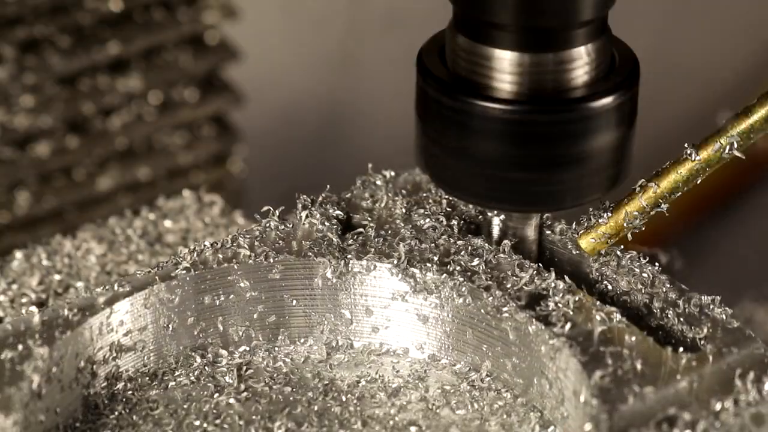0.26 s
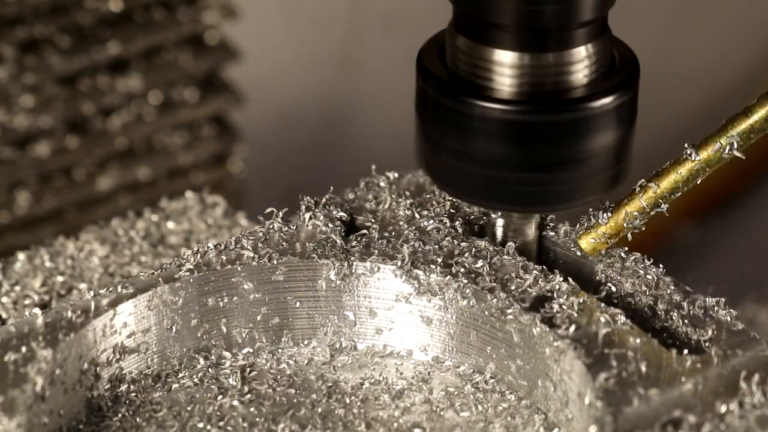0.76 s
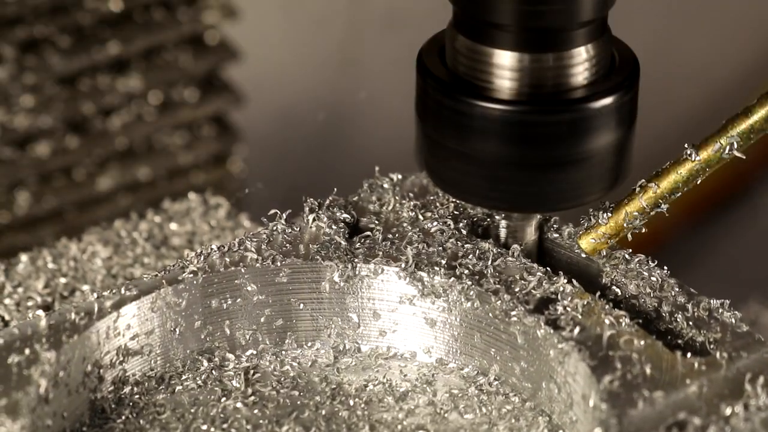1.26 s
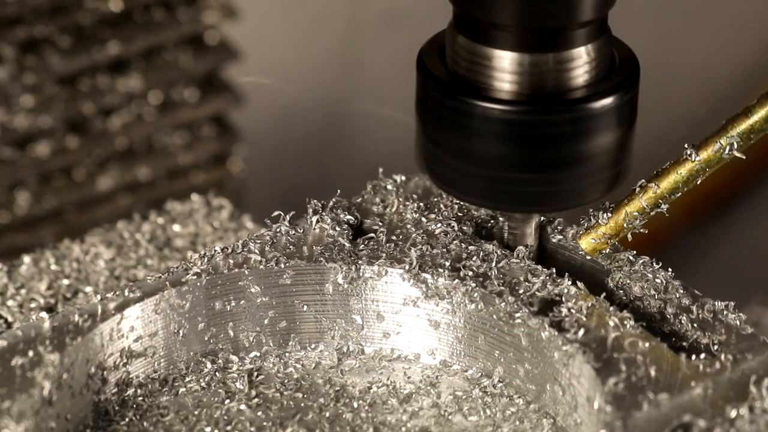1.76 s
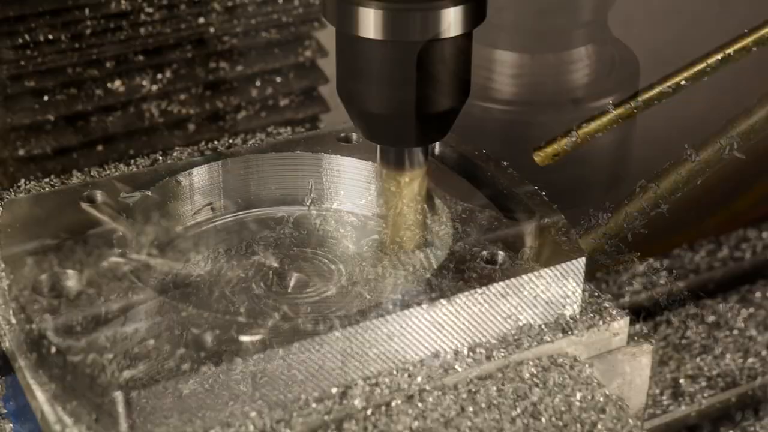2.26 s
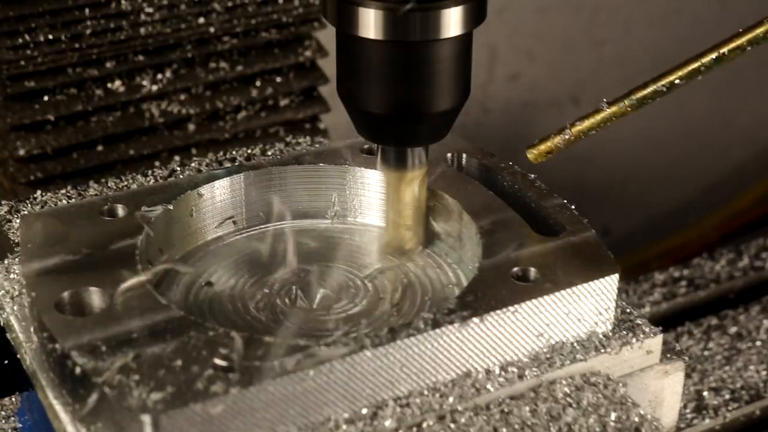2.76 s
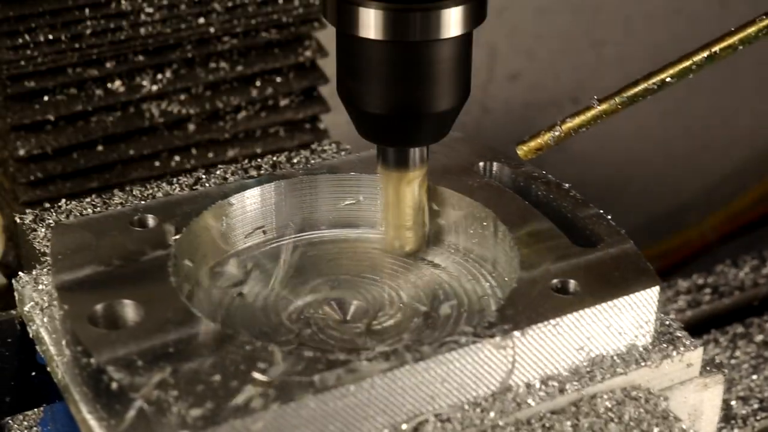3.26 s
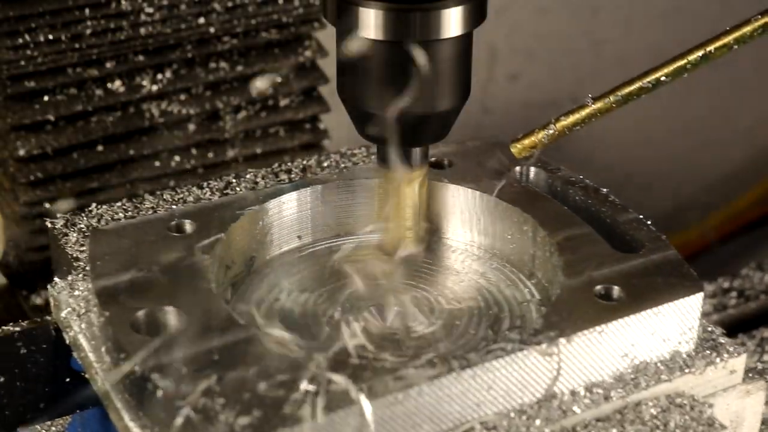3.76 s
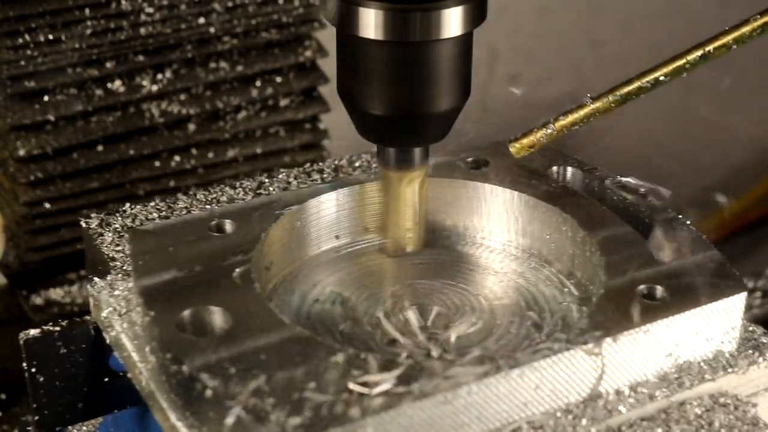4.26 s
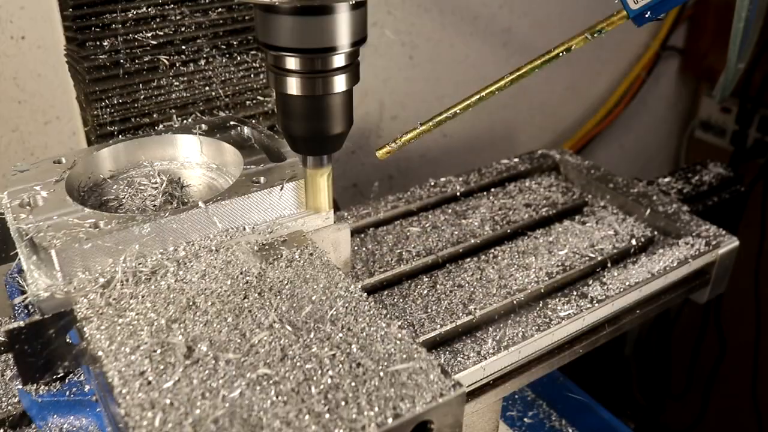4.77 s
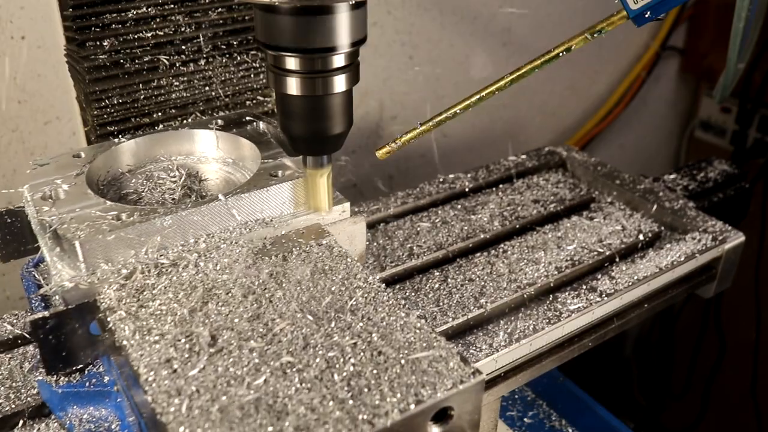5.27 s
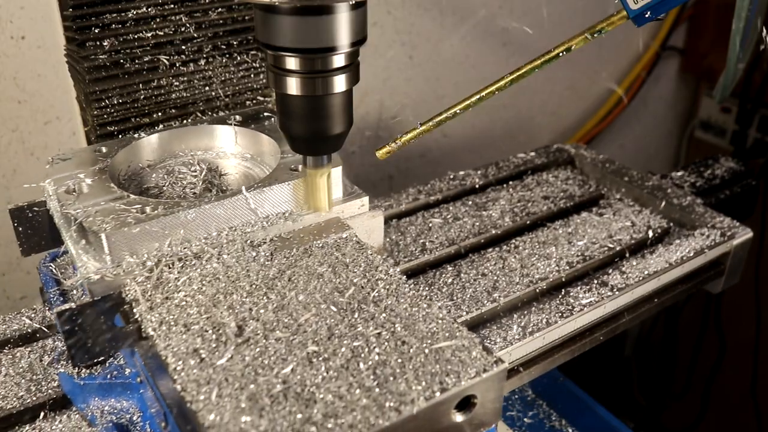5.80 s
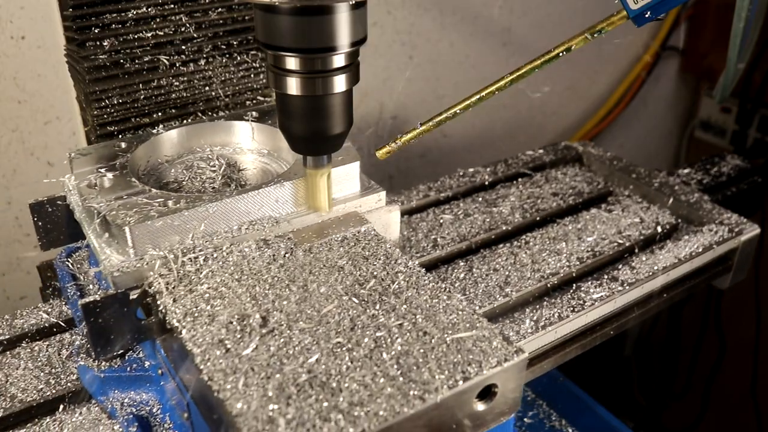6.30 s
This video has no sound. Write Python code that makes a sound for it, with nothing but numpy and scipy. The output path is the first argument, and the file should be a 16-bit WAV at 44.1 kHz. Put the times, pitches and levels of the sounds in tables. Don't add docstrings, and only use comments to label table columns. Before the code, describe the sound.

A continuous, bright air-nozzle hiss dominates a small metal milling machine at work. It opens with a toned whirr and faint squeal, which melt into a thinner, mostly airy passage with light ticks. A low spindle hum then swells in with short squeaks and dull chip knocks, and continues into a steadier facing cut. Close stereo microphone in a small workshop, hiss slightly stronger on the right, very little echo.

```python
import sys
import numpy as np
from scipy import signal
from scipy.fft import rfft, irfft, next_fast_len
from scipy.io import wavfile
from scipy.ndimage import uniform_filter1d, map_coordinates

SR = 44100
rng = np.random.default_rng(int(sys.argv[2]) if len(sys.argv) > 2 else 0)


def nominal_scale(level):
    x = np.asarray(level, float) / 20
    return 10 ** x


def wav_out(sig):
    wavfile.write(sys.argv[1], SR, np.round(np.clip(np.atleast_2d(sig).T, -1, 1) * 32767).astype(np.int16))


N = 288414
TIME = np.arange(N) / SR
FFT_SIZE = next_fast_len(N, True)

# start in seconds, end in seconds.
DISSOLVES = [
    (-.2, .33),
    (2.03, 2.51),
    (4.33, 4.8),
]
# jet in dB, frame in dB.
JOB_DB = [(6, -31.5), (-0.5, -41.5), (3, -41), (5, -35)]
MID_JOB_S = [.1, 1.2, 3.3, 5.6]

# frequency in Hz, level in dB per Hz.
JET_SMALL_CUTTER = [
    ([(4130, -76.2), (5000, -78.7), (6890, -74.0), (7580, -69.9), (9470, -79.7), (10850, -77.6), (11370, -81.1), (15500, -84.1)], [(4130, -74.1), (5000, -77.1), (7060, -69.1), (7750, -62.7), (9470, -76.3), (10680, -72.5), (14990, -79.0), (15500, -82.2)]),
    ([(4050, -84.5), (4480, -86.4), (5340, -76.1), (5940, -84.5), (6550, -85.3), (7580, -73.0), (9470, -83.0), (10340, -80.8), (10770, -74.3), (11280, -84.2), (14210, -80.7), (14640, -86.6), (15590, -86.0)], [(4050, -81.8), (4480, -85.1), (5770, -73.1), (7060, -74.9), (7670, -62.4), (8530, -63.6), (9390, -75.8), (10680, -70.3), (11110, -75.7), (11630, -74.1), (12490, -80.8), (13180, -75.6), (15590, -82.7)]),
]
JET_LARGE_CUTTER = [
    ([(4050, -78.7), (4820, -80.5), (5770, -76.4), (6120, -77.1), (6460, -73.5), (6980, -74.1), (7840, -68.5), (8530, -72.4), (9390, -71.7), (10160, -76.1), (10770, -75.2), (11710, -79.1), (15590, -84.9)], [(4050, -78.7), (5340, -78.0), (6200, -72.2), (6550, -67.6), (6980, -70.6), (7490, -66.0), (8270, -65.5), (8610, -68.7), (9730, -68.5), (10340, -74.7), (13780, -76.1), (14730, -81.5), (15590, -80.8)]),
    ([(4050, -77.6), (4820, -80.8), (6200, -74.8), (6550, -71.8), (6800, -73.4), (7580, -69.7), (8700, -71.5), (9040, -69.8), (10080, -73.9), (13010, -75.2), (13350, -77.8), (14380, -76.8), (15590, -80.6)], [(4050, -76.9), (5430, -76.7), (5770, -71.4), (6290, -72.8), (6720, -68.1), (6980, -70.6), (8440, -65.7), (8790, -69.6), (9130, -67.2), (10770, -74.8), (12060, -72.7), (14470, -76.8), (15590, -81.2)]),
]
JET = JET_SMALL_CUTTER + JET_LARGE_CUTTER
# frequency in Hz, likeness from 0 to 1.
JET_ALIKE = [
    [(4500, .2), (5000, .75), (5500, .6), (6600, .45), (7500, .85), (10000, .7), (12500, .5), (15000, .6)],
    [(4500, .45), (6000, .45), (7700, .8), (11000, .5), (15000, .3)],
    [(5000, .15), (6500, .55), (9000, .7), (12000, .55), (15000, .6)],
]
# frequency in Hz, lead in radians.
JET_LEAD = [
    [(4500, .9), (5100, .2), (5300, 3), (5800, 2.9), (6100, 1.7), (6450, 2.8), (6800, .5), (7300, 2.5),
     (7900, 2.4), (8200, 1.7), (9300, 1.4), (11500, 2.7), (14300, 2.9), (15000, 1.9)],
    [(4000, .3), (6000, .8), (7500, .3), (12000, 1.2), (15000, 1.4)],
    [(4000, -.3), (6000, -1.1), (8000, -.4), (10500, -.9), (15000, -.6)],
]
JET_BANDS = (4570, 8200, 11000, 18000)
JET_LEFT_DB = [0, -1.2, -.5, 0]
# rate in Hz, depth from 0 to 1.
CHOP = [(124, 0.2), (64.2, 0.08), (123.7, 0.11), (124.55, 0.18)]
# time in seconds, jet core in dB.
AIR = [(0, -36), (.35, -39.5), (1.05, -41), (1.77, -43), (2.06, -42.5), (2.3, -39.5), (2.71, -37.5),
       (3.22, -37), (3.6, -37), (4.3, -38.5), (4.64, -39), (5.4, -37.5), (6.1, -38.5), (6.36, -37.5),
       (6.54, -38.5)]
# upper band at mid job in dB,
# its drift in dB per second, top band at mid job in dB, its drift in dB per second.
AIM = [(-8, -6, -9, 0.1), (-1, 3.5, -5.5, 3), (-1.5, 1.5, -6.5, -2.5), (0, 0.5, -2.5, -1.2)]
# peak in seconds, length in seconds, level in dB from the core.
FLARE = (2.28, 0.46, -4)
# frequency in Hz, level in dB per Hz.
RIM = [(9000, -60), (10600, -12), (11200, 2), (12800, -6), (13600, -6), (15500, -40)]
# start in seconds,
# end in seconds, frequency at start in Hz, frequency at end in Hz, gain in dB.
GAP_LEFT = [(-.2, .9, 8200, 8200, -3), (.1, 1.4, 6600, 6600, -3.5), (-.2, 2, 5900, 5900, -2.5),
            (-.2, 2.1, 13700, 13700, -2), (.5, 2.1, 11800, 11800, -1), (1, 2.7, 7750, 7500, -1.5),
            (.2, 3.4, 3500, 3500, 2.5), (.2, 3, 4200, 4200, -2.5), (.1, .8, 10800, 10800, 3),
            (.7, 1.8, 5000, 5000, -2), (2.3, 3.1, 8400, 8700, 3), (2.3, 2.9, 13200, 13000, 3),
            (2.1, 2.6, 5200, 5200, 3), (2.1, 2.6, 15600, 15600, 3.5), (3, 3.5, 7300, 7300, -2.5),
            (3.7, 4.4, 6500, 6900, -2), (3.7, 4.4, 10500, 10600, -3), (3.9, 4.5, 8700, 8600, -3),
            (4.45, 5.7, 10400, 10400, 3.5), (4.4, 5.2, 5100, 4600, 3), (4.8, 6.7, 9400, 9400, -2.5),
            (4.7, 5.2, 1100, 1100, 2.5), (6, 6.7, 4400, 4300, 3), (.4, 1.6, 950, 950, 2.5),
            (2.7, 3.5, 15400, 15400, -3), (4.3, 6.7, 13900, 13800, 2), (2.9, 4.2, 2600, 3100, -2),
            (2.05, 2.7, 10800, 13300, 2.5), (5.9, 6.7, 1250, 1200, -3)]
GAP_RIGHT = [(-.2, 1, 8250, 8250, -4), (.2, 1.3, 7650, 7650, 2), (.8, 1.9, 8650, 8600, 2.5),
             (1.9, 2.9, 7350, 7400, -3), (.3, 1.05, 9300, 9300, 3), (-.2, .7, 6100, 6000, -3),
             (.2, 2.2, 4400, 4700, 2.5), (-.2, 1.5, 13200, 13200, -2.5), (.8, 3.4, 6800, 6400, 2.5),
             (2.2, 2.9, 8300, 8200, 2), (2.8, 3.2, 9600, 9600, -3.5), (2.45, 2.9, 10600, 10700, 3),
             (3.3, 4.4, 9600, 9700, 2), (3.3, 4.1, 10800, 10700, 2), (3.4, 4.3, 8400, 8600, -3),
             (3.8, 4.8, 7900, 7200, 3), (1.8, 4.6, 5600, 5700, 3), (2.1, 4.4, 4000, 3800, -3),
             (4.6, 6.4, 3800, 3800, -2), (4.3, 5.3, 5100, 4500, 3), (4.6, 5.7, 10200, 10300, 3),
             (4.8, 6.3, 11900, 11400, 2.5), (4.7, 6.4, 12900, 12700, -2.5), (5.5, 6, 8400, 8400, 3),
             (3.7, 4.3, 13100, 13100, -2.5), (4.7, 5.2, 1100, 1100, 2.5), (3.05, 3.7, 13100, 12100, 2.5),
             (2.05, 2.8, 15600, 15300, 3), (3.9, 4.4, 15600, 15600, 3), (3.3, 3.8, 7600, 7500, -2),
             (2.05, 2.7, 10800, 13300, 3.5), (2.05, 2.6, 4650, 4850, -3.5)]

# frequency in Hz, level in dB per Hz.
FRAME_SMALL_CUTTER = [
    [(59, -42), (100, -18), (128, -20), (189, -26), (246, 7), (280, -18), (605, -6), (813, 2.5), (1130, -7),
     (1290, -1.5), (2350, -4.5), (3380, -10), (5000, -11), (6500, -48), (11000, -120)],
    [(59, -47), (100, -8), (129, -17), (152, -21), (216, -18), (249, 0.5), (340, -10), (564, -13),
     (601, -19.5), (829, -7), (1050, -13.5), (1200, -8.5), (1850, -5), (2270, -9.5), (2840, 6), (4600, 9),
     (5980, -37), (10100, -120)],
]
FRAME_LARGE_CUTTER = [
    [(59, -46), (100, -31), (192, -12.5), (216, -21.5), (246, 1), (320, -18), (474, -14), (531, -9.5),
     (605, -16), (840, -13.5), (1060, -18), (1420, -13.5), (2430, -12.5), (2870, -18), (5000, -12),
     (6500, -49), (11000, -120)],
    [(59, -45), (100, -24), (129, -28), (181, -18), (220, -13), (246, 4), (271, -6.5), (299, -12),
     (419, -20), (812, -15.5), (880, -15.5), (1600, -14.5), (2720, -10), (3190, -8.5), (4700, -8),
     (6110, -52), (10300, -120)],
]
FRAME = FRAME_SMALL_CUTTER + FRAME_LARGE_CUTTER
# frequency in Hz, likeness from 0 to 1.
FRAME_ALIKE = [(100, 0.88), (400, 0.83), (800, 0.65), (2500, 0.68), (3500, 0.57), (4000, 0.2), (4500, 1)]
# frequency in Hz, lead in radians.
FRAME_LEAD = [(3600, 0), (3950, 2.3), (4400, .9)]
FRAME_BALANCE_DB = [-3.5, -2, -1.5, -1.5]
FRAME_BANDS = (105, 2600, 4470)
# time in seconds, level in dB.
LOAD = [(0, -39.5), (.18, -44), (.35, -53.5), (.9, -53), (1.42, -55), (2.09, -51.5), (2.42, -46),
        (2.97, -44.5), (3.53, -47), (4.2, -48.5), (4.46, -45.5), (4.66, -43), (5.34, -43.5), (6.1, -45.5),
        (6.54, -45)]
# level at mid job in dB, drift in dB per second.
EDGE = [(-1.2, 3), (0, 0), (-1.05, -0.5), (-0.55, -0.3)]
# frequency in Hz, width in Hz, gain in dB.
CASTING = [
    [(870, 50, -5), (1240, 30, 4), (2580, 50, 3)],
    [(855, 45, 3), (760, 40, -2), (620, 40, 2.5), (1130, 50, -3), (150, 20, -3)],
    [(820, 30, 2), (480, 25, -2), (420, 30, 2.5), (140, 15, -5), (730, 40, -2)],
    [(815, 30, 4), (2900, 90, 2.5), (3110, 50, -1.5), (3230, 60, 2), (3380, 50, -3), (270, 15, -3),
     (190, 15, -4), (880, 30, -3)],
]
# frequency in Hz, level in dB per Hz.
RUMBLE = [(13, -51), (22, -13), (54, -5), (70, -4), (92, -4), (115, 11), (150, -29), (250, -120)]
RUMBLE_DB = [-75, -83, -74.5, -65.5]
# peak in seconds, length in seconds, rumble in dB,
# second order in dB.
LURCHES = [
    (2.6, 0.68, -72, -70),
    (3.11, 0.13, -71, -68),
    (4.57, 0.3, -81, -58),
]

# frequency in Hz, level in dB.
FIRST_TONES = [(82.5, -63), (123.8, -55), (165, -63), (247.6, -46), (333, -60), (454, -58), (824.6, -44),
               (989.5, -52), (1324, -55), (1690, -54), (2643, -56), (2799, -56), (3499, -54)]
# frequency in Hz, level in dB.
SLOT_TONES = [(64.2, -87), (128.5, -76)]
# frequency in Hz, level in dB.
SLOT_RATTLE = [(248, -73), (258, -69), (296.1, -72)]
# time in seconds, frequency in Hz.
WHINE = [
    (3263, -57),
    (4.4, 3275),
    (6.54, 3195),
]
# free sixth order in Hz, loaded sixth order in Hz,
# bite in seconds, sag time in seconds.
SHAFT = [
    (249.7, 247.4, 2.22, .16),
    (249.145, 249.145, 4.4, .16),
]
# sixth in dB over the load, then third, ninth and second in dB from the sixth.
STRONG_DB = [
    (-0.5, -16.5, -21, -27),
    (0.8, -13, -20, -40),
]
# multiple of the shaft's rate, level in dB from the sixth.
POCKET_ORDERS = [(4, -19.5), (5, -35), (7, -15), (8, -16.5), (12, -19), (13, -15), (14, -16.5), (20, -22),
                 (32, -14), (35, -14.5)]
FACING_ORDERS = [(1, -32), (4, -24), (5, -16), (7.08, -14), (8, -16.5), (10, -25), (12, -20), (13, -17.5),
                 (17, -17), (23, -24), (32, -21), (35, -14), (38, -15)]
# order, start in seconds, end in seconds, gain in dB.
SINGING = [(9, 2.86, 3.02, 5), (9, 3.28, 4.2, 8.5), (6, 3.75, 4.2, 1.5), (9, 4.72, 5.1, 8),
           (9, 5.2, 5.8, 8), (9, 6.05, 6.52, 5), (13, 2.68, 3.12, 8), (13, 3.55, 4.22, 7),
           (6, 2.12, 2.4, 4.5), (6, 4.36, 4.55, -2.5), (6, 4.8, 5.1, -2), (3, 2.16, 2.34, 6),
           (3, 3.6, 4.4, 2), (3, 4.7, 5.08, -2), (6, 2.4, 2.9, 1.5), (3, 5.08, 5.5, 1.5),
           (6, 5.5, 5.85, 1.5), (13, 4.45, 4.56, 8), (13, 3.72, 3.86, 3), (8, 4.4, 5.3, 4)]

# peak in seconds, length in seconds, frequency in Hz, level in dB.
RUBS = [(.08, 0.32, 3300, -48), (.1, 0.4, 2690, -51.5), (2.4, 0.067, 3340, -48), (2.534, 0.11, 3440, -58),
        (2.975, 0.05, 2450, -50), (3.04, .045, 2430, -49)]
# time in seconds, peak in dB, upper modes in dB.
KNOCKS = [(.3826, -48, -2), (.433, -50, 1), (.9269, -50, -4), (1.7465, -51, 0), (1.8229, -53, -2),
          (1.8673, -48, -3), (2.0189, -46, -2), (2.1026, -45, -1), (3.8132, -39, -1), (4.8224, -43, -5),
          (4.9259, -45, -5), (5.0217, -35, -9), (5.4522, -39, -5), (5.71, -40, -5), (5.804, -41, -3),
          (6.0025, -41, -3), (6.1163, -44, -4), (6.3592, -44, -3), (6.4669, -44, -3), (0.693, -46, 2),
          (.8054, -53, -2), (0.838, -42, 1), (0.945, -40, -10), (1.0074, -46, 0), (1.0194, -42, -5),
          (1.2062, -44, -3), (1.256, -43, 3.5), (1.3548, -43, 0), (1.443, -49, 3), (1.4865, -42, -3),
          (1.5806, -44, -3), (1.629, -44, 2), (1.723, -51, -2), (2.454, -32.5, -21), (2.577, -32, -15.5),
          (2.6285, -37, -15), (2.6968, -39, -18), (2.793, -37, -15), (2.818, -36, -12), (2.9144, -33, -7),
          (2.9582, -35, -12), (3.014, -30, -4), (3.131, -39, -15), (3.204, -39, -6), (3.3045, -45, -8.5),
          (3.717, -36, -17)]
# frequency in Hz, level in dB, 60 dB decay time in seconds.
WORK_MODES = [(1330, -1, .028), (1480, -1, .028), (1720, -3, .035), (1900, 0, .045), (2400, -8, .03)]


def along(points, hz):
    f, v = np.transpose(points)
    return np.interp(np.log(hz + 1), np.log(f + 1), v)


def curves(rows):
    s, *columns = np.transpose(rows)
    return [np.interp(TIME, s, column) for column in columns]


def wobble(rate):
    return map_coordinates(rng.standard_normal(int(N * rate / SR) + 4), [TIME * rate])


def bump(peak_s, length_s):
    return np.exp(-((TIME - peak_s) / (length_s / 2)) ** 2)


def fades():
    rise = [np.clip((TIME - start) / (end - start), 0, 1) for start, end in DISSOLVES]
    return np.array([1 - rise[0], rise[0] - rise[1], rise[1] - rise[2], rise[2]])


def mix(layers, gains):
    gains = gains / np.sqrt((gains ** 2).sum(0))
    return sum(gain * layer for gain, layer in zip(gains, layers))


def enclosure(wet_db, t60):
    t = TIME[:SR // 4]
    tail = rng.standard_normal((2, len(t))) * nominal_scale(-60 * t / t60)
    tail[1] = 0.69 * tail[0] + 1.3 * tail[1]
    return 1 + nominal_scale(wet_db) * rfft(tail / np.linalg.norm(tail[0]), FFT_SIZE)


def rush(left, right, alike, lead, patchy_db, edges_hz, wet_db):
    _, _, cells = signal.stft(rng.standard_normal((2, N)), nperseg=512)
    patches = uniform_filter1d(rng.standard_normal(cells.shape[1:]), 5, 0)
    patches = uniform_filter1d(patches, 16, 1)
    patchy = cells * nominal_scale(patchy_db * patches / patches.std())
    shared, private = rfft(signal.istft(patchy, nperseg=512)[1][:, :N], FFT_SIZE)

    hz = np.fft.rfftfreq(FFT_SIZE, 1 / SR)
    share = np.clip(along(alike, hz) + 0.15 * (hz > 6500), 0, 1)
    other = share * shared + np.sqrt(1 - share ** 2) * private
    other = other * np.exp(1j * along(lead, hz))
    pair = np.array([shared * nominal_scale(along(left, hz)), other * nominal_scale(along(right, hz))])
    pair = pair * enclosure(wet_db, t60=0.078)

    below = [1 / (1 + (hz / edge) ** 28) for edge in edges_hz]
    bands = [irfft(pair * (high - low), FFT_SIZE)[:, :N] for low, high in zip(below, below[1:])]
    return [band / band.mean(0).std() for band in bands]


def flutes(chop_hz, depth):
    swing = depth * nominal_scale(0.65 * wobble(4.2))
    return 1 + swing * np.sin(2 * np.pi * chop_hz * TIME + 1.46 * wobble(2.525))


def jet():
    rim, = rush(RIM, RIM, JET_ALIKE[1], JET_LEAD[1], patchy_db=1.5, edges_hz=(9000, 18000), wet_db=-14)
    peak_s, length_s, flare_db = FLARE
    flare = nominal_scale(flare_db) * bump(peak_s, length_s)
    layers = []
    for k, ((left, right), (chop_hz, depth)) in enumerate(zip(JET, CHOP)):
        place = (1, 0, 1, 2)[k]
        core, upper, top = rush(left, right, JET_ALIKE[place], JET_LEAD[place],
                                patchy_db=.9, edges_hz=JET_BANDS, wet_db=-14)
        upper_db, upper_drift, top_db, top_drift = AIM[k]
        since = np.clip(TIME - MID_JOB_S[k], -1.1, .75)
        air = core + nominal_scale(upper_db + upper_drift * since) * upper
        air = air + nominal_scale(top_db + top_drift * since) * top
        layers.append(nominal_scale([[JET_LEFT_DB[k]], [0]]) * flutes(chop_hz, depth) * air)
    jobs = mix(layers, fades() * nominal_scale(np.array(JOB_DB)[:, :1]))
    return nominal_scale(curves(AIR)[0] + 0.052 * wobble(22)) * (jobs + flare * rim)


def cast(x, modes):
    hz = np.fft.rfftfreq(FFT_SIZE, 1 / SR)
    gain_db = sum(db * np.exp(-((hz - centre) / width) ** 2) for centre, width, db in modes)
    return irfft(rfft(x, FFT_SIZE) * nominal_scale(gain_db), FFT_SIZE)[:, :N]


def lurch(column):
    return sum(nominal_scale(row[column]) * bump(row[0], row[1]) for row in LURCHES)


def frame():
    layers = []
    for k, (chop_hz, depth) in enumerate(CHOP):
        right = [(hz, db - 9 * (230 < hz < 260)) for hz, db in FRAME[k]]
        left = [(hz, db + FRAME_BALANCE_DB[k] * min(hz / 1500, 1)) for hz, db in right]
        low, cut = rush(left, right, FRAME_ALIKE, FRAME_LEAD,
                        patchy_db=0.31, edges_hz=FRAME_BANDS, wet_db=-15)
        edge_db, drift = EDGE[k]
        since = np.clip(TIME - MID_JOB_S[k], -1.2, 1.2)
        body = nominal_scale(0.14) * low + nominal_scale(edge_db + drift * since) * cut
        layers.append(flutes(chop_hz, 0.81 * depth) * cast(body, CASTING[k]))
    jobs = mix(layers, fades() * nominal_scale(np.array(JOB_DB)[:, 1:]))
    rumble, = rush(RUMBLE, RUMBLE, [(30, 0.73), (100, 0.52)], [(100, 0)],
                   patchy_db=-3.0, edges_hz=(15, 112), wet_db=-35)
    stand = nominal_scale(RUMBLE_DB) @ fades() + lurch(column=2)
    return nominal_scale(curves(LOAD)[0] + 0.056 * wobble(10)) * jobs + stand * rumble


def spell(t, start, end, edge_s):
    return np.clip(np.minimum(t - start, end - t) / edge_s + .5, 0, 1)


def gap(air):
    width_hz, swell_s = 300, .3
    hz, t, cells = signal.stft(air, SR, nperseg=512)
    for port, rows in zip(cells, (GAP_LEFT, GAP_RIGHT)):
        gain_db = 0
        for start, end, from_hz, to_hz, db in rows:
            centre = np.interp(t, [start, end], [from_hz, to_hz])
            band = np.exp(-((hz[:, None] - centre) / width_hz) ** 2)
            gain_db = gain_db + db * spell(t, start, end, swell_s) * band
        port *= nominal_scale(gain_db)
    return signal.istft(cells, SR, nperseg=512)[1][:, :N]


def tones(lines, phase, unsteady_db, rate, waver, free=1):
    total = 0
    for multiple, db in lines:
        size = np.sqrt(2) * nominal_scale(db + unsteady_db * wobble(rate))
        angle = multiple * phase + waver * wobble(rate) + free * rng.uniform(0, 2 * np.pi)
        total = total + size * np.sin(angle)
    return total


def singing(order):
    return sum(db * spell(TIME, start, end, edge_s=0.081)
               for k, start, end, db in SINGING if round(k) == order)


def whine(turn):
    twin_phase = 2 * np.pi * np.cumsum(curves(WHINE[1:])[0]) / SR
    twin = tones([(1, -57)], twin_phase, unsteady_db=3.5, rate=30, waver=1.1)
    fading = nominal_scale(-2.5 * (TIME - 5.3))
    return twin + fading * tones(WHINE[:1], turn, unsteady_db=2.5, rate=20, waver=.4)


def large_cutter(shaft_row, strong_row, weak):
    free_hz, loaded_hz, bite_s, sag_s = shaft_row
    sixth_db, third_db, ninth_db, second_db = strong_row
    sixth_hz = np.interp(TIME, [bite_s, bite_s + sag_s], [free_hz, loaded_hz])
    shaft = 2 * np.pi * np.cumsum(sixth_hz / 6) / SR
    orders = tones([(6, singing(order=6))], shaft, unsteady_db=1.4, rate=26, waver=.1, free=0)
    strong = [(3, third_db + singing(order=3)), (9, ninth_db + singing(order=9)), (2, second_db)]
    orders += tones(strong, shaft, unsteady_db=1.2, rate=18, waver=.35, free=0)
    weak = [(k, db + singing(order=round(k))) for k, db in weak]
    orders += nominal_scale(-3.0) * tones(weak, shaft, unsteady_db=2.0, rate=10, waver=0.16)
    load_db = uniform_filter1d(curves(LOAD)[0], SR // 4)
    return nominal_scale(load_db + sixth_db) * orders


def spindle():
    gain, turn = fades(), 2 * np.pi * TIME
    hum = gain[0] ** .68 * tones(FIRST_TONES, turn, unsteady_db=1.2, rate=25, waver=.25)
    hum += gain[1] * tones(SLOT_TONES, turn, unsteady_db=1.5, rate=8, waver=.3)
    hum += gain[1] * tones(SLOT_RATTLE, turn, unsteady_db=3, rate=24, waver=.9)
    hum += gain[3] * whine(turn)
    named = [k for k, _ in FACING_ORDERS] + [2, 3, 6, 9]
    comb = [(k, -24.5 + 4 * rng.standard_normal()) for k in range(11, 41) if k not in named]
    hum += gain[2] ** 0.5 * large_cutter(SHAFT[0], STRONG_DB[0], POCKET_ORDERS)
    hum += gain[3] ** 0.5 * large_cutter(SHAFT[1], STRONG_DB[1], FACING_ORDERS + comb)
    hum += lurch(column=3) * tones([(83, 0)], turn, unsteady_db=1.5, rate=15, waver=.3)
    return hum * nominal_scale(np.array([[.3], [-.3]]))


def rubs():
    return sum(bump(peak_s, length_s)
               * tones([(hz, db)], 2 * np.pi * TIME, unsteady_db=4, rate=260, waver=1.7)
               for peak_s, length_s, hz, db in RUBS)


def chips():
    crack_db, crack_t60 = -2, 0.011
    out, t = np.zeros(N + SR), TIME[:SR // 8]
    for s, db, upper_db in KNOCKS:
        knock = out[round(s * SR):][:len(t)]
        snap = np.diff(uniform_filter1d(rng.standard_normal(len(t) + 1), size=6))
        knock += nominal_scale(db + crack_db - 60 * t / crack_t60) * snap / snap.std()
        for hz, level, t60 in WORK_MODES:
            mode_db = db + 1.0 + level + (upper_db - 0.5) * (hz > 1600)
            size = nominal_scale(mode_db - 60 * t / t60) * (1 - np.exp(-t / 0.0013))
            knock += size * np.sin(2 * np.pi * hz * rng.normal(1, 0.024) * t)
    return out[:N]


def scene():
    return gap(jet() + frame()) + spindle() + rubs() + chips()


def band_limit(x):
    return signal.sosfilt(signal.butter(12, 15885, fs=SR, output="sos"), x)


def record(dry):
    top_hz, slope_hz = 15905, 130
    hz = np.fft.rfftfreq(FFT_SIZE, 1 / SR)
    passband = np.clip((top_hz - hz) / slope_hz, 0, 1)
    kept = irfft(rfft(dry, FFT_SIZE) * passband, FFT_SIZE)[:, :N]
    return band_limit(kept)


dry = scene()
out = record(dry)
wav_out(out)
```